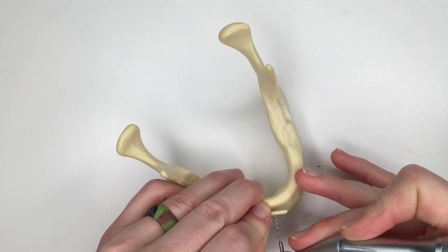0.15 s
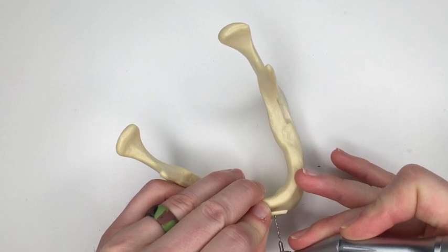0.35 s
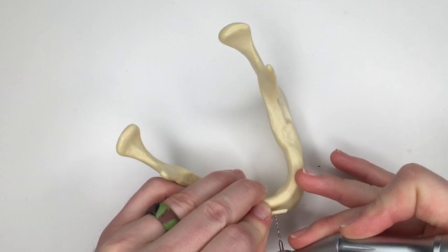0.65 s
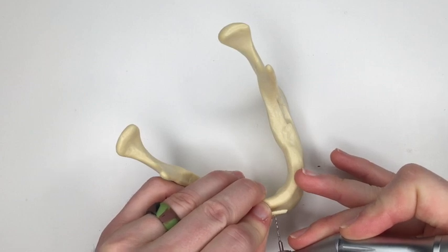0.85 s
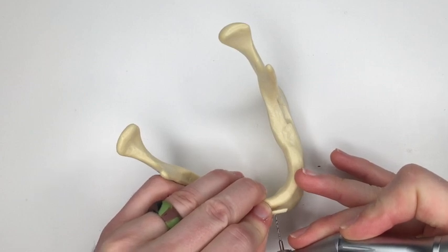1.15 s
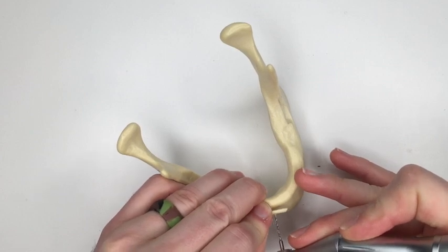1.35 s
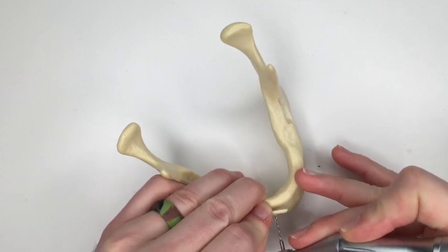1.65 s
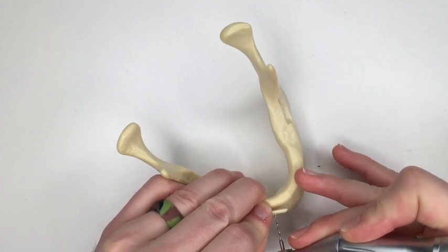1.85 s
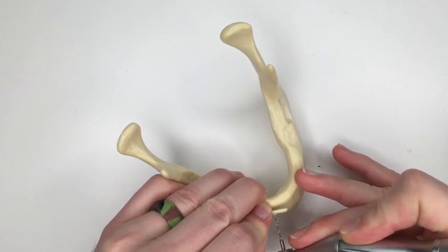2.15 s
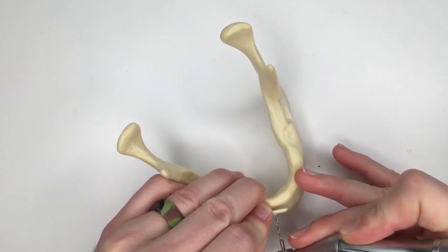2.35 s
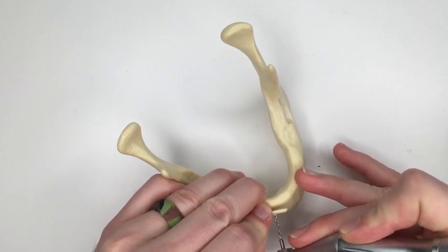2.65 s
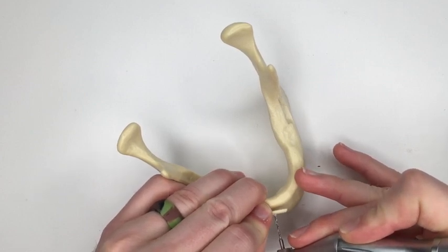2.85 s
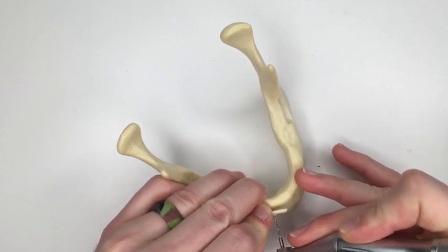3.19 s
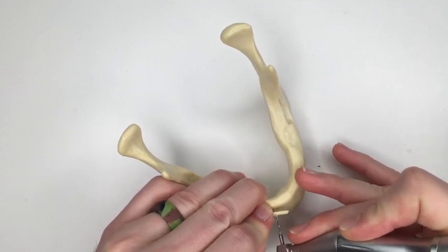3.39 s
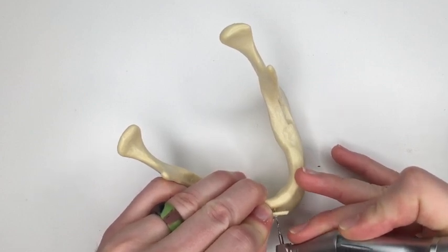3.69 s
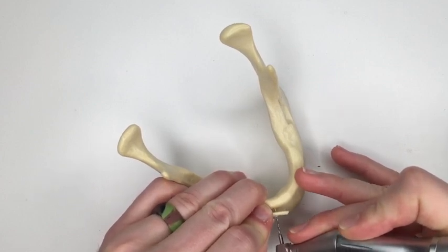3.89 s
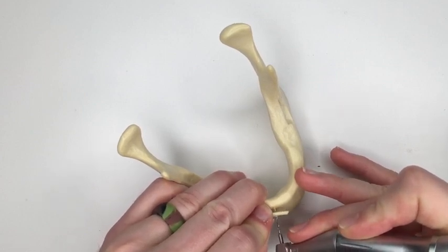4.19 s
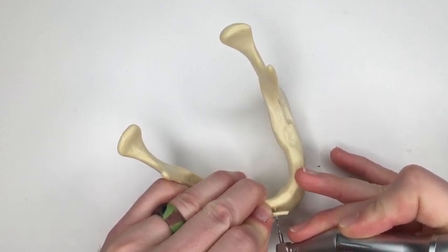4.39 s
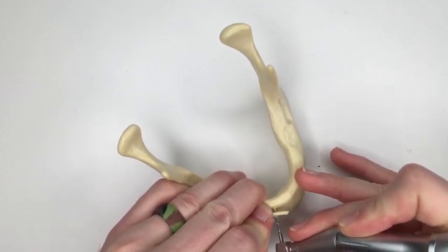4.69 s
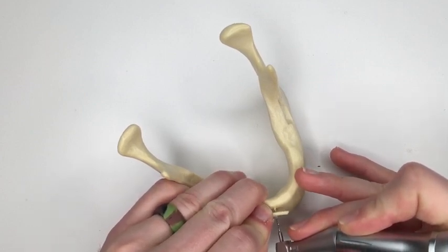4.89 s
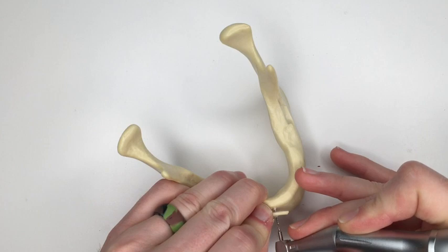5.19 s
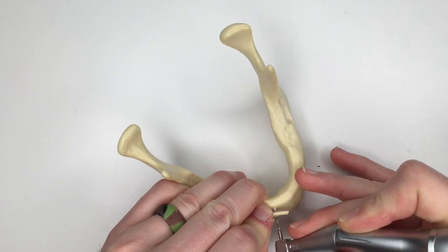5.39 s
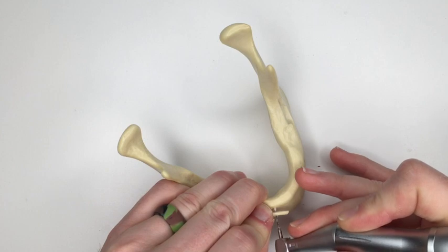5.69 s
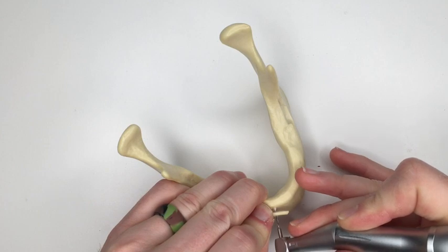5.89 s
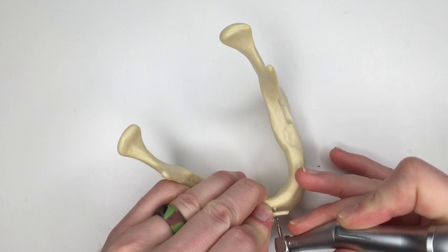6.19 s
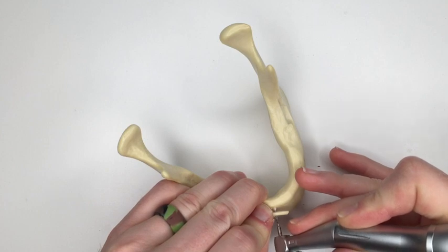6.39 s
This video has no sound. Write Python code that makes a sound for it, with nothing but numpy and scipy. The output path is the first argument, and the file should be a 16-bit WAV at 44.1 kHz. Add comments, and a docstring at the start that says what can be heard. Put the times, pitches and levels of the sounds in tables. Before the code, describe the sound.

A small dental drill jerks awake with a knock and rasp, whines upward through a fluttering metallic hiss, then grinds steadily into a plastic jaw model.

```python
"""A dental handpiece in a quiet, softly rumbling room jerks awake: its gears knock, its dry shaft rasps once a turn.
As it spins up, motor and gear lines sing at multiples of the shaft speed over a faint comb of gear buzz,
and loose gear teeth rattle the steel head into a bright, fluttering hiss while the bur grazes faintly.
The bur then catches on a thin plate, bites, and scrapes into a model jaw.
As it leans in, the play in the gears mostly closes, the rattle evens out and loaded bearing lines join the whine."""
import sys
import numpy as np
from scipy import signal
from scipy.fft import rfft, irfft
from scipy.io import wavfile
from scipy.ndimage import uniform_filter1d, map_coordinates

SR = 44100
rng = np.random.default_rng(int(sys.argv[2]) if len(sys.argv) > 2 else 0)


def to_wav(s):
    """Save 16-bit WAV."""
    ch = np.atleast_2d(s).T  # columns
    pcm = np.round(np.clip(ch, -1, 1) * 32767)  # PCM
    wavfile.write(sys.argv[1], SR, pcm.astype(np.int16))


N = 288414

# room rumble contour: (frequency [Hz], relative level per Hz [dB])
ROOM_RUMBLE = [(15, -59), (25, -1.5), (59, 1), (86, -6.5), (113, -4.5), (195, -10), (227, -7), (271, -23),
               (307, -7), (348, -6.5), (420, -28.5), (500, -8), (650, -31), (1100, -120)]
# soft swells of low rumble: (time of top [s], half length to 1/e [s], centre [Hz], width [Hz], level at top [dB])
RUMBLE_SWELLS = [(2.0, 1, 58.6, 39.8, -76), (2.317, 0.41, 260, 260, -75), (5.75, .8, 168, 281.2, -75.5)]
# motor shaft speed asked for by the pedal: (time [s], speed [turns/s])
PEDAL_SPEED = [(0.05, 50.0), (0.37, 243.4), (0.45, 249.8), (0.62, 193.4), (0.85, 201.0), (1.02, 214.9),
               (1.56, 223.9), (1.71, 266.8), (2.12, 264.0), (2.64, 296.4), (2.76, 290.0), (3.13, 298.2),
               (4.59, 299.4), (4.62, 302.0), (4.88, 302.7), (5.05, 306.2), (5.27, 302.1), (6.54, 302.1)]
# hand on the drill: (time [s], pressure [0 free, 1 cutting, 2 leaning in], play in the gears [0-1])
HAND_FEED = [(0.45, 0, 0.65), (1.3, 0, 0.93), (2.2, 0.65, 1.0), (2.92, 0.52, 0.76), (3.14, 0.65, 0.39),
             (3.78, 1.13, 0.84), (4.45, 1.6, 0.28), (4.8, 1.74, 0.25), (5.12, 1.6, 0.27), (5.4, 1.83, 0.27),
             (6.54, 2, 0.33)]
# gears taking up their slack: (time [s], level at onset [dB])
SLACK_KNOCKS = [(.056, -56), (.072, -49), (0.092, -46.5), (0.119, -47), (0.126, -47)]
# bur catching on the plate: (time [s], level at onset [dB])
PLATE_CATCHES = [(3.352, -67), (3.822, -79)]
# plate and jaw resonances under the bur: (frequency [Hz], width [Hz], relative level [dB])
JAW_MODES = [(327, 160, 2.5), (645, 620, 0), (1037, 490, 5.5), (1770, 1050, 4), (2600, 700, 1)]
# steel head resonances: (frequency [Hz], width [Hz], relative level slow [dB], fast [dB], leaning in [dB])
HEAD_MODES = [(2950, 2000, -24, -29.5, -16), (3700, 160, -12, -28, -13), (4130, 2700, -17, -15, -12),
              (5700, 1420, -11, -15, -16.5), (7120, 1800, -10, -8, -8.5), (7940, 1500, -8.5, -6, -6),
              (9770, 880, -4.5, -4.5, -5.5), (10450, 230, -12, -7, -3), (10555, 1400, -3.5, 2, -2),
              (11200, 50, 1, -14, -26), (11860, 650, 1.5, -0.5, -2.5), (13180, 970, 0, -0.5, 1.5),
              (13200, 150, -26, -10, -12), (14460, 1700, -10, -9.5, -8)]
# gear and bearing cage wobbles that bunch the rattle: (rate [cycles/shaft turn], depth at full play [dB])
RATTLE_WOBBLES = [(3 / 22, 2.25), (1 / 4, 2.5), (3 / 11, 0.38), (5 / 12, 2.2), (1 / 2, 0.85),
                  (6 / 11, 1.26), (3 / 4, 2), (5 / 4, 3), (3 / 2, 2.5), (4, 1)]
# casing resonances that lift passing lines: (frequency [Hz], width [Hz], power added relative to the line [dB])
CASING_MODES = [(2207, 170, 8), (2810, 150, 3.5), (3620, 150, 5), (4220, 250, -5), (4550, 280, 6.5),
                (5254, 53, 7)]
# motor and gear lines before the casing: (multiple of shaft rate, level free [dB], cutting [dB], leaning in [dB])
SHAFT_ORDERS = [(1, -97, -99, -83), (2, -90, -84, -81), (3, -79, -82, -67), (4, -86, -73, -65),
                (5, -83, -74, -74), (6, -80, -88, -79), (7, -87, -71, -73), (8, -77, -76, -73),
                (9, -81, -80, -86), (10, -81, -68, -67), (11, -78, -75, -75), (12, -76, -82, -67),
                (13, -77, -69, -68), (14, -76, -74, -79), (15, -76, -78, -78), (16, -78, -78, -82),
                (17, -74, -75, -73), (18, -76, -64, -65), (19, -84, -67, -67), (24, -87, -81, -69),
                (25, -84, -69, -66), (26, -84, -65, -58), (26.75, -82, -81, -69), (27, -73, -61, -59),
                (28, -83, -68, -65), (33, -78, -70, -65), (36, -73, -61, -68), (44, -73, -75, -60)]
# lines of a loaded bearing: (multiple of ball rate, level at pressure 2 [dB])
BEARING_LINES = [(2, -79), (3, -82), (5, -82), (7, -75), (8, -80), (9, -74)]

FULL_SPEED_HZ = 300  # reference shaft speed for rattle and graze levels


def undb(db):
    """Decibels to gain."""
    return 10 ** (np.asarray(db) / 20)


def unit(x):
    """Scale to rms 1."""
    return x / np.sqrt(np.mean(x ** 2))


def curves(rows):
    """Draw each column of a table as a control line, one value a sample."""
    s, *columns = np.transpose(rows)
    return [np.interp(np.arange(N) / SR, s, c) for c in columns]


def walk(rate):
    """Random levels drawn rate times a second and joined by glides; spread near 1."""
    hold = max(int(SR / rate), 1)
    steps = np.repeat(rng.standard_normal(N // hold + 1), hold)[:N]
    return 1.367 * uniform_filter1d(steps, hold)


def shape(x, modes):
    """Colour a signal with resonances (Hz, width Hz, dB) whose powers add, then scale to rms 1."""
    f = np.arange(1, N // 2 + 2) * SR / N
    power = sum(undb(db) ** 2 / (1 + ((f * f - hz * hz) / (f * width)) ** 2) ** 2 for hz, width, db in modes)
    return unit(irfft(rfft(x) * np.sqrt(power), N))


def room(hiss_db=-80, air_db=-83, air_hz=1800, air_width_hz=4000, rumble_db=-75.0):
    """A steady low rumble under faint, even room noise and hiss."""
    hz, db = np.transpose(ROOM_RUMBLE)
    f = np.arange(1, N // 2 + 2) * SR / N
    contour = undb(np.interp(np.log(f), np.log(hz), db))
    rumble = irfft(rfft(rng.standard_normal(N)) * contour, N)
    air = undb(air_db) * shape(rng.standard_normal(N), [(air_hz, air_width_hz, 0)])
    return unit(rumble) * undb(rumble_db) + air + undb(hiss_db) * rng.standard_normal(N)


def swells():
    """Soft rumbles of filtered noise rise and sink in bell-shaped swells."""
    t = np.arange(N) / SR
    return sum(undb(db) * np.exp(-((t - s) / half) ** 2) * shape(rng.standard_normal(N), [(hz, width, 0)])
               for s, half, hz, width, db in RUMBLE_SWELLS)


def shaft_speed(start_s=0.044, kick_s=0.014, inertia_s=0.08):
    """The rotor jerks into motion, then follows the pedal, smoothed by its inertia."""
    pedal_hz, = curves(PEDAL_SPEED)
    smooth_hz = uniform_filter1d(pedal_hz, int(inertia_s * SR), mode="nearest")
    running_s = np.maximum(np.arange(N) / SR - start_s, 0)
    # an idle floor of 1 Hz keeps the logarithms of speed finite
    return 1 + (smooth_hz - 1) * (1 - np.exp(-running_s / kick_s))


def first_knocks(knock_s=0.0021):
    """The gears take up their slack in short, decaying noise knocks that ring the steel head."""
    t = np.arange(N) / SR
    force = sum(undb(db) * (t > s) * np.exp(-np.abs(t - s) / knock_s) for s, db in SLACK_KNOCKS)
    return force * shape(rng.standard_normal(N), [row[:3] for row in HEAD_MODES])


def start_chatter(hz, turns, rub_db=-52.5, rub_db_per_decade=21, lift_off_hz=207, lift_width_hz=12,
                  rest_hz=2150, climb_from_hz=143, climb=15, rub_s=0.0029, rub_turns=0.1,
                  grit_db=-6, grit_hz=2500, grit_width_hz=4200):
    """The dry shaft rasps once a turn, harder and higher with speed, until it lifts off on its bearing."""
    dry = (1 - np.tanh((hz - lift_off_hz) / lift_width_hz)) / 2
    force = dry * undb(rub_db + rub_db_per_decade * np.log10(hz / lift_off_hz))
    from_rub_s = (turns % 1 - .45) / hz
    burst = np.exp(-(from_rub_s / np.minimum(rub_s, rub_turns / hz)) ** 2)
    pitch = rest_hz + climb * np.maximum(hz - climb_from_hz, 0)
    # each rub starts its ring afresh
    rasp = np.sin(2 * np.pi * pitch * from_rub_s)
    grit = undb(grit_db) * shape(rng.standard_normal(N), [(grit_hz, grit_width_hz, 0)])
    return force * burst * (rasp + grit)


def cutting(hz, turns, pressure, graze_db=-75, graze_db_per_decade=17, bite_db=-73.5, bite_s=0.26,
            bite_db_per_pressure=1.94, chop=0.49, catch_s=0.021):
    """The flutes graze faintly, catch on the plate, then scrape into the jaw, louder under pressure."""
    t = np.arange(N) / SR
    graze = undb(graze_db + graze_db_per_decade * np.log10(hz / FULL_SPEED_HZ))
    # the bite fades in from the first catch
    bite_in = np.clip((t - PLATE_CATCHES[0][0]) / bite_s, 0, 1)
    bite = bite_in * undb(bite_db + bite_db_per_pressure * pressure)
    # the scrape pulses once in two shaft turns
    force = np.hypot(graze, bite) * (1 + chop * np.cos(np.pi * turns))
    force = force + sum(undb(db) * (t > s) * np.exp(-np.abs(t - s) / catch_s) for s, db in PLATE_CATCHES)
    return force * shape(rng.standard_normal(N), JAW_MODES)


def tooth_pattern(turns, size=1024):
    """Tooth errors come round again with the bur shaft, once in four motor turns."""
    place = turns * size / 4
    pattern = irfft(np.exp(2j * np.pi * rng.random(size // 4)), size)
    return unit(map_coordinates(pattern, [place % size], order=3, mode="grid-wrap"))


def motor_buzz(hz, turns, level_db, buzz_db=-27, centre_hz=3500, width_hz=3200, slow_slope_db=25):
    """The turning gear train adds a comb of weak lines to the middle range, weaker at low speed."""
    comb = shape(tooth_pattern(turns), [(centre_hz, width_hz, 0)])
    return comb * undb(level_db + buzz_db + slow_slope_db * np.log10(hz / hz.max()))


def rattle_level(hz, play, full_speed_db=-47, db_per_decade=22.5, play_db=7.5):
    """Gear rattle in dB grows with speed and with play."""
    return full_speed_db + db_per_decade * np.log10(hz / FULL_SPEED_HZ) + play_db * play


def rattle(hz, turns, pressure, play, level_db, clicks_per_turn=30, hiss_db=1, pattern_db=-2, flutter_db=0.9,
           stop_db=3.5, ring_hz=5550, ring_width_hz=360, ring_db=-18.5, ring_from_hz=277.4, ring_span_hz=20):
    """Tooth impacts and rubbing, bunched by the wobbles, ring the steel head."""
    clicks = (rng.random(N) < clicks_per_turn * hz / SR) * rng.standard_normal(N)
    rubbing = undb(hiss_db) * rng.standard_normal(N)
    contact = unit(clicks) + rubbing + undb(pattern_db) * tooth_pattern(turns)
    # wobble phases drift slightly
    bunch_db = sum(db * np.cos(2 * np.pi * (rate * turns + rng.random() + 0.011 * walk(6.6)))
                   for rate, db in RATTLE_WOBBLES)
    # the teeth can part freely, but their backlash limits how hard they meet
    force = contact * undb(play * np.minimum(bunch_db + flutter_db * walk(90), stop_db))
    # level the force over 1/12 s, leaving the quicker flutter
    force = force / np.sqrt(uniform_filter1d(force ** 2, SR // 12) + 1e-18)
    slow, fast, pressed = (shape(force, [(f, width, dbs[k]) for f, width, *dbs in HEAD_MODES]) for k in range(3))
    speed = np.clip((hz - 234) / 31, 0, 1)
    leaning = np.clip((pressure - 1.0) / 1.05, 0, 1)
    free = slow + speed * (fast - slow)
    # near full speed, loose teeth set one more ring of the head going
    ring_gain = undb(ring_db) * play ** 2 * np.clip((hz - ring_from_hz) / ring_span_hz, 0, 1)
    ringing = ring_gain * shape(force, [(ring_hz, ring_width_hz, 0)])
    return (free + leaning * (pressed - free) + ringing) * undb(level_db)


def casing(hz):
    """Gain of the casing for a line at this frequency, lifted as it glides through each resonance."""
    lift = sum(undb(db) ** 2 / (1 + (2 * (hz - f) / w) ** 2) for f, w, db in CASING_MODES)
    return np.sqrt(1 + lift)


def whine(hz, turns, pressure, play, waver_db=1.5, waver_per_order_db=0.1128, slow_slope_db=3.9,
          balls_per_turn=1.0905):
    """Shaft lines change balance with pressure and waver with play; bearing lines grow under load."""
    out = 0
    below_speed = np.minimum(np.log10(hz / 262), 0)
    for order, *states_db in SHAFT_ORDERS:
        waver = play * (waver_db + waver_per_order_db * order) * walk(14)
        db = np.interp(pressure, np.arange(3), states_db) + waver
        # a slow shaft meets its faults more softly, so the high harmonics fall away first
        db = db + slow_slope_db * order * below_speed
        tone = np.sin(2 * np.pi * (order * turns + rng.random()))
        out = out + undb(db) * casing(order * hz) * tone
    for order, db in BEARING_LINES:
        loaded = undb(db + 2 * walk(11)) * (pressure / 2) ** 2
        out = out + loaded * np.sin(2 * np.pi * (order * balls_per_turn * turns + rng.random()))
    # the lines only form once the shaft has come up to speed; sqrt(2) makes their levels rms
    return np.sqrt(2) * out * np.clip((hz - 160) / 50, 0, 1)


def scene(speed_jitter=0.000522):
    """One shaft drives every drill layer over the room; both channels carry the same sound."""
    pressure, play = curves(HAND_FEED)
    # looser gears make the speed less steady
    hz = shaft_speed() * (1 + speed_jitter * play * walk(40))
    turns = np.cumsum(hz) / SR
    level_db = rattle_level(hz, play)
    background = room() + swells()
    contacts = first_knocks() + start_chatter(hz, turns) + cutting(hz, turns, pressure)
    gears = motor_buzz(hz, turns, level_db) + rattle(hz, turns, pressure, play, level_db)
    mono = background + contacts + gears + whine(hz, turns, pressure, play)
    return np.array([mono, mono])


def record(dry, top_hz=15600):
    """The highest treble is cut off steeply."""
    return signal.sosfilt(signal.ellip(12, .1, 80, top_hz, fs=SR, output="sos"), dry)


dry = scene()
out = record(dry)
to_wav(out)
```